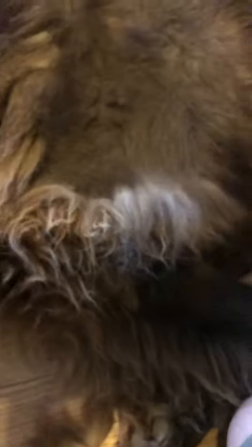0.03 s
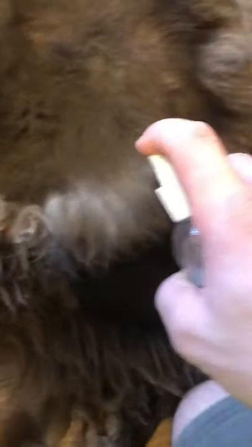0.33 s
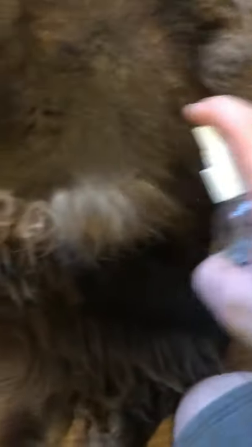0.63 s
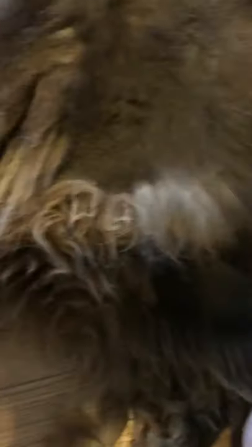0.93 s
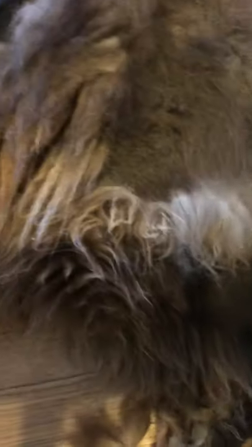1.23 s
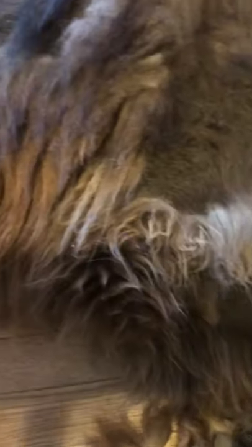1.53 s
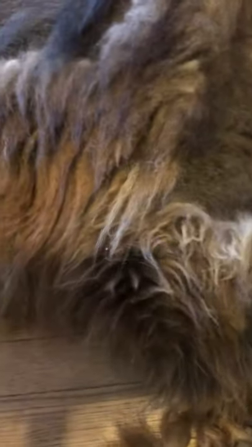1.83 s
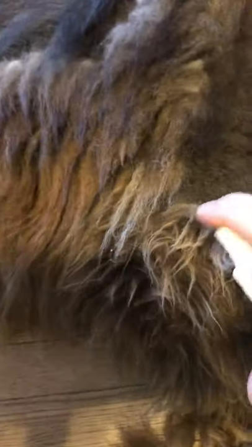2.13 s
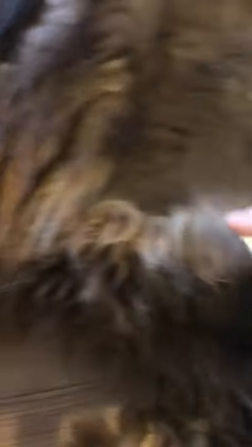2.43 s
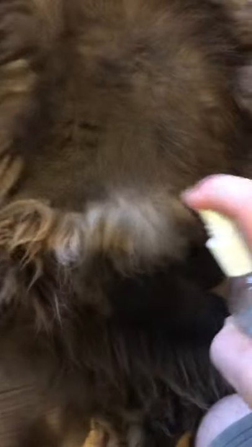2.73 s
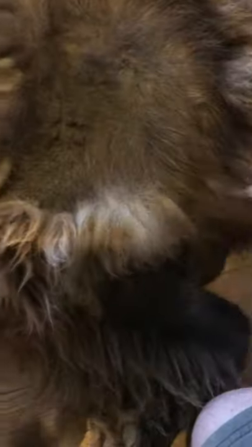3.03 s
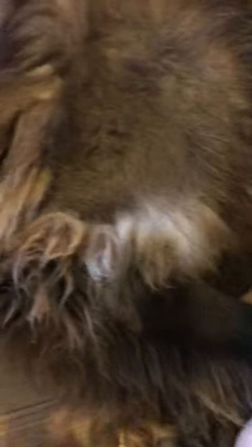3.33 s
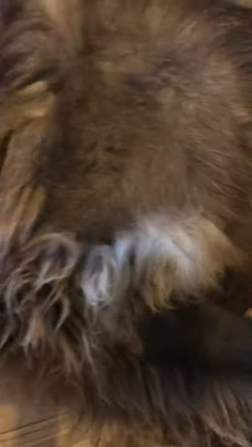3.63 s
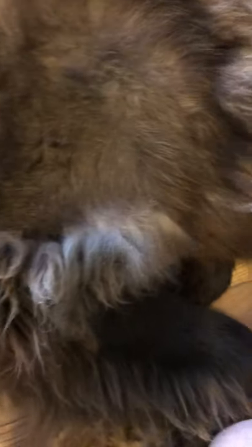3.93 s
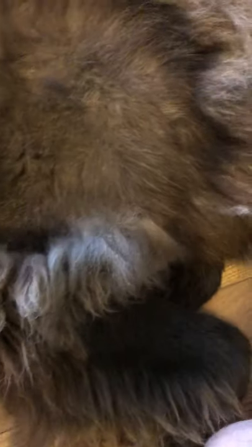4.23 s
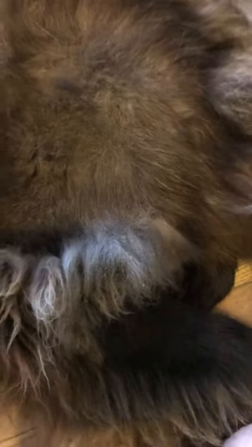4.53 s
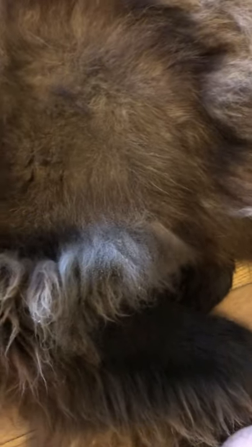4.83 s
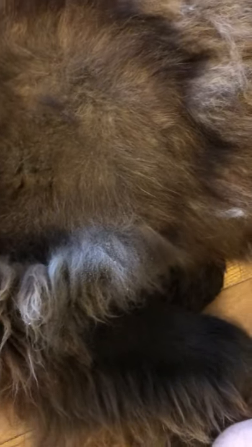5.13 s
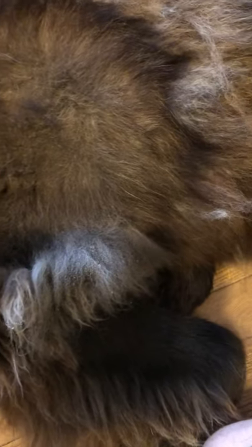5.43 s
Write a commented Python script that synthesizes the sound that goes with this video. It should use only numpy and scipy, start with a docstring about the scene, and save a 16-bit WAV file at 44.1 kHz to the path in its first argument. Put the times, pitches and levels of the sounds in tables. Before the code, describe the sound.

In a small, quiet room, a finger-pump bottle sprays an animal fur eight times, close to the microphone. Each short hiss swells and stops dead, and the plunger returns with a sharp plastic snap and a tiny liquid gulp. Then, a little further away, dull thumps sound on the wooden floor, the fur rustles faintly and a few light woody taps follow. A low room rumble and hum run underneath.

```python
"""A small finger-pump bottle mists an animal fur on a wooden floor: eight quick squirts, up close.
Each push hisses harder as pressure builds, then stops dead as the plunger bottoms out. On release the
seal scrapes, liquid gulps into the pump and its valve snaps. Then bumps ring the floorboards, the fur
rustles under a hand and light woody taps follow, all over the rumble and hum of a quiet, small room."""
import sys
import numpy as np
from scipy import signal
from scipy.fft import rfft, irfft
from scipy.io import wavfile
from scipy.ndimage import uniform_filter1d

SR = 44100
rng = np.random.default_rng(int(sys.argv[2]) if len(sys.argv) > 2 else 0)


def transcribe(signal):
    """Save signal, clipped to [-1, 1], as a 16-bit WAV file at the path in sys.argv[1]."""
    frames = np.atleast_2d(signal).T
    limited = np.clip(frames, -1, 1)
    pcm = np.round(limited * 32767).astype(np.int16)
    wavfile.write(sys.argv[1], SR, pcm)


N = 246474
TIME = np.arange(N) / SR

# tone of the still room: f/Hz, level/dB
ROOM_TONE_EQ = [(15, -63), (25, -27), (44, -20), (70, -11.5), (92, -10), (123, -6), (190, -12), (229, -13),
                (249, -16), (326, -17.5), (405, -23), (1230, -33.5), (4140, -43.5), (5140, -41.5),
                (16000, -49)]
# mains hum partials: f/Hz, level/dB
HUM_PARTIALS = [(59, -67), (120, -64)]
# reverb bands: f/Hz, level/dB, t60/s
REVERB_BANDS = [(170, -18.5, 0.23), (400, -13, 0.31), (800, -13, 0.22), (2010, -15, 0.32),
                (5040, -16.5, 0.28), (8900, -18.5, 0.19), (14000, -23, 0.28)]

# skin sliding on the bottle: peak t/s, level/dB, 20 dB rise/s, 20 dB fall/s
SKIN_SLIDES = [(3.17, -55.5, 0.21, 0.2), (3.34, -58.5, 0.016, 0.097)]
# dull rubs as the grip shifts: peak t/s, level/dB, 20 dB rise/s, 20 dB fall/s
GRIP_SHIFTS = [(1.235, -52.5, 0.13, 0.058), (1.44, -61.5, .12, 0.14)]
# faint hiss as the bottle is put aside: peak t/s, level/dB, 20 dB rise/s, 20 dB fall/s
ASIDE_HISS = [(3.8, -64, 0.96, 1.93)]
# tone of the slide, the grip and that hiss: f/Hz, level/dB
SLIDE_EQ = [(600, -3), (1500, -15), (2400, -4), (3300, -7), (5200, -4.5), (8000, -2), (11000, -6),
            (15000, -15)]
GRIP_EQ = [(100, -19), (210, 1.5), (400, -9), (800, -13), (1400, -16.5), (2300, -19.5), (3500, -23),
           (12000, -43)]
ASIDE_EQ = [(1500, -2), (4300, -8.5), (5200, -2), (5900, -7.5), (7000, -7.5), (10000, -18),
            (13500, -33), (16000, -18)]
# small dry cracks: t/s, level/dB
CRACKS = [(3.728, -32.5), (4.5733, -36.5)]
# their brittle tone: f/Hz, level/dB
CRACK_EQ = [(300, -3), (1600, -30), (2100, 2.5), (3000, -13), (3900, -3.5), (5500, -13), (9000, -15.5),
            (15000, -29)]

# envelope of the hand stroking the fur: t/s, level/dB
FUR_STROKE = [(4.45, -71), (4.52, -60), (4.61, -57.5), (4.71, -71.5), (4.79, -64), (4.86, -55), (5.0, -47),
              (5.1, -48), (5.22, -58), (5.32, -65)]
# tone of the rustle: f/Hz, level/dB
FUR_EQ = [(300, -5), (480, -8.5), (900, -6.5), (1400, -11.5), (2000, -10), (2400, -15), (3100, -7),
          (4100, -17), (5500, -14.5), (9000, -25), (15000, -38)]
# the hide catches and crinkles: t/s, level/dB, length/s, relative hollow ring/dB
HIDE_CRINKLES = [(4.845, -48, 0.018, -35), (4.913, -53, 0.005, -22), (4.939, -40.5, 0.022, -22),
                 (4.994, -50.5, .029, 5.5), (5.066, -46, 0.0068, -11), (5.273, -52.5, .0088, -9)]

# wood modes for thumps and taps: f/Hz, level/dB, t60/s
WOOD_MODES = [(75, -9, 0.29), (116, -9.5, 0.36), (160, -23, 0.19), (170.7, 3, 0.2), (221.5, 0.5, 0.2),
              (249, -2.5, 0.25), (287.6, -10.5, 0.26), (330, -6, 0.16), (392.6, -9.5, 0.12),
              (438, -11, 0.13), (638, -15.5, 0.18), (707, -12, 0.04), (818, -16, 0.055), (1020, -23, 0.063),
              (1340, -30, 0.24), (1500, -4, 0.036), (1630, -4.5, 0.026), (2180, -24, 0.033)]
# dull floor thumps, the first followed by two bounces: t/s, level/dB, contact/ms, ring f/Hz, ring level/dB,
# ring swell/s
FLOOR_THUMPS = [(3.73, -25, 0.25, 223, -25, 0.0056), (3.7463, -27.5, 1.8, 178, -38, .0074),
                (3.771, -39, 1.5, 242, -32, 0.0028), (3.957, -33, 0.61, 223, -43.5, 0.034),
                (4.098, -42, 0.29, 183, -36.5, .013), (4.206, -40.5, 0.41, 167, -50, 0.0065),
                (4.285, -30.5, 1.56, 174.8, -42, 0.038), (4.409, -43, 0.7, 195, -39.5, 0.007),
                (4.448, -42, 0.85, 330, -58, 0.0067)]
# light woody taps: t/s, level/dB, contact/ms, ring f/Hz, ring level/dB
WOODY_TAPS = [(4.669, -46, 0.54, 340, -49), (4.996, -41, 0.31, 830, -36), (5.329, -28.5, 0.72, 400, -54),
              (5.43, -28.5, 0.54, 474, -45), (5.533, -32.5, 0.71, 366, -39)]
# tone of the wooden clatter on each hit: f/Hz, level/dB
CLATTER_EQ = [(80, -17.5), (400, -2.5), (700, 4), (1100, -1), (1650, 1.5), (2300, 2.5), (3500, 0),
              (12000, -11)]

# pump pushes: start t/s, stop t/s, full jet level/dB, gulp level/dB
PUMP_PUSHES = [(.286, .399, -29, -44), (.886, 0.998, -29, -48), (1.247, 1.35, -28, -41),
               (1.566, 1.667, -28.5, -39.5), (1.889, 1.982, -30, -41), (2.211, 2.306, -30.5, -41),
               (2.534, 2.632, -29.5, -40), (2.876, 2.971, -29, -40)]
# pump releases: snap t/s, snap level/dB, gulp level/dB, seal scrape level/dB
PUMP_RELEASES = [(0.0403, -14.5, -39, -56), (0.5134, -32, -43, -62), (1.135, -21, -46, -59),
                 (1.4852, -17.5, -42, -59), (1.8057, -14, -42.5, -56), (2.1193, -17.5, -39, -59),
                 (2.4333, -15, -41.5, -59), (2.7812, -19, -43.5, -59), (3.1111, -20, -47.5, -61)]
# two slugs of liquid per push: offset t/s, relative level/dB, starting f/Hz
SLUGS_ON_PUSH = [(.0016, -2.5, 1497), (.0158, -3, 1314)]
# two more just ahead of each snap: offset t/s, relative level/dB, starting f/Hz
SLUGS_ON_RELEASE = [(-.011, -7.5, 1440), (-.0032, -0.5, 1908)]
# tone of the plastic pump head: f/Hz, level/dB
HEAD_EQ = [(300, -12), (900, -12), (2800, -13), (4200, -3.5), (6400, -2.5), (9300, -3), (11500, -15),
           (16000, -31.5)]
# bright tone of the mist: f/Hz, level/dB
MIST_EQ = [(150, -31), (300, -25.5), (620, -24), (1150, -20), (1550, -16.5), (2440, -11), (3500, -7),
           (4300, -4.5), (6500, -2.5), (9550, -3), (12000, -10), (14000, -16.5), (16000, -21)]

# the finger lifts and the plunger comes unstuck with a tick and a blip, ahead of the snap
UNSTICK_LEAD_S, UNSTICK_TICK_DB, UNSTICK_GULP_DB, UNSTICK_HZ = .055, -34.5, -53, 1254


def undb(db):
    """Decibels to gain."""
    return 10 ** (np.asarray(db) / 20)


def unit(x):
    """Scale to rms 1."""
    return x / np.sqrt(np.mean(x ** 2))


def add(track, s, sound):
    """Mix a sound into a track at time s, if that falls within it."""
    i = int(s * SR)
    if 0 <= i < N:
        track[i:i + len(sound)] += sound[:N - i]


def eq(x, points):
    """Minimum-phase EQ through (f/Hz, level/dB) points, with unit power gain."""
    size = 4096
    hz, db = np.transpose(points)
    log_hz = np.log(np.arange(size // 2 + 1) * SR / size + 1)
    log_gain = np.log(undb(np.interp(log_hz, np.log(hz), db)))
    cepstrum = irfft(log_gain)
    cepstrum[1:size // 2] *= 2
    cepstrum[size // 2 + 1:] = 0
    response = irfft(np.exp(rfft(cepstrum)))
    return signal.fftconvolve(x, response / np.linalg.norm(response))[:len(x)]


def band(x, lo_hz, hi_hz):
    """Steep band-pass."""
    return signal.sosfilt(signal.butter(3, [lo_hz, hi_hz], "band", fs=SR, output="sos"), x)


def resonate(x, hz, width_hz):
    """One resonance, gain 1 at its centre."""
    return signal.lfilter(*signal.iirpeak(hz, hz / width_hz, fs=SR), x)


def drift(rate_hz):
    """Smooth random modulation, rms 1."""
    hold = max(int(SR / rate_hz), 1)
    steps = rng.standard_normal(N)[np.arange(N) // hold]
    return unit(uniform_filter1d(steps, hold))


def grains(per_s, spread_db):
    """Random tiny impacts of uneven size, rms 1."""
    hits = (rng.random(N) < per_s / SR) * rng.standard_normal(N)
    sizes = undb(spread_db * np.minimum(rng.exponential(size=N), 4))
    return unit(hits * sizes)


def fade(curve):
    """Gain along a (t/s, level/dB) curve, silent outside it."""
    s, db = np.transpose(curve)
    return undb(np.interp(TIME, s, db, left=-120, right=-120))


def swells(rows):
    """Gain that rises to each peak and falls away, both at a steady rate in dB."""
    return sum(undb(db - 20 * np.maximum((s - TIME) / rise, (TIME - s) / fall))
               for s, db, rise, fall in rows)


def room_tone(air_db=-59.5):
    """The bed: low room rumble, thin hiss and a wavering mains hum."""
    air = unit(eq(rng.standard_normal(N), ROOM_TONE_EQ))
    air = signal.sosfilt(signal.butter(4, 48, "high", fs=SR, output="sos"), air)
    hum = 0
    for hz, db in HUM_PARTIALS:
        amplitude = np.sqrt(2) * undb(db + 2 * drift(2.9))
        hum += amplitude * np.sin(2 * np.pi * hz * TIME + 0.74 * drift(9.5))
    return air * undb(air_db + 1.3 * drift(4.77)) + hum


def reverb(send, predelay_s=.005):
    """Diffuse reflections from floor and walls: a short tail, each band with its own decay."""
    t = TIME[:SR // 2]
    hz, db, t60 = np.transpose(REVERB_BANDS)
    spectrum = rfft(rng.standard_normal(len(t)))
    log_hz = np.log(np.arange(len(spectrum)) * SR / len(t) + 1)
    tail = 0
    for share, band_db, decay_s in zip(np.eye(len(hz)), db, t60):
        envelope = np.exp(-np.log(1000) * t / decay_s) * (t > predelay_s)
        wash = irfft(spectrum * np.interp(log_hz, np.log(hz), share), len(t))
        tail += undb(band_db) * wash * envelope / np.linalg.norm(envelope)
    return signal.fftconvolve(send, tail)[:N]


def bottle_handling():
    """Skin slides softly over the bottle and rubs dully as the grip shifts; a thin hiss follows."""
    skin = grains(per_s=5000, spread_db=-3.5)
    slide = undb(0.5) * swells(SKIN_SLIDES) * eq(skin, SLIDE_EQ)
    grip = swells(GRIP_SHIFTS) * eq(skin, GRIP_EQ)
    hiss = swells(ASIDE_HISS) * eq(skin, ASIDE_EQ)
    return slide + grip + hiss


def cracks(decay_s=0.00057):
    """Tiny brittle cracks, each a very short spit of noise."""
    force, t = np.zeros(N), TIME[:SR // 100]
    for s, db in CRACKS:
        add(force, s, undb(db) * rng.standard_normal(len(t)) * np.exp(-t / decay_s))
    return undb(3.5) * eq(force, CRACK_EQ)


def fur_rustle(release_s=0.0027):
    """Hairs slip past the hand in dense clicks with a thin scrape; the hide catches and rings hollow."""
    catch, ring_gain = np.zeros(N), np.zeros(N)
    for s, db, length_s, ring_db in HIDE_CRINKLES:
        burst = undb(db) * (TIME > s) * np.exp(-np.maximum(TIME - s - length_s, 0) / release_s)
        catch += burst
        ring_gain += burst * undb(ring_db)
    drag = undb(-1.5) * fade(FUR_STROKE) + undb(-5.5) * catch
    hairs = grains(per_s=3500, spread_db=2) * undb(1.6 * drift(97))
    rustle = band(eq(hairs * drag, FUR_EQ), 180, 16000)
    grit = unit(band(grains(per_s=2800, spread_db=-9), 2700, 3900))
    scrape = drag * grit * undb(-11 + 2 * drift(45))
    hollow = ring_gain * unit(band(grains(per_s=1700, spread_db=-0.5), 705, 950))
    return rustle + scrape + hollow


def wood_cues(thump_deep_db=1.3, tap_deep_db=-17.5, bounce_s=.0105, bounce_db=-5, tap_swell_s=0.0042):
    """Floor thumps come with full low end, the first bouncing twice after it lands; the woody taps are lighter
    and touch twice."""
    for s, db, contact_ms, ring_hz, ring_db, swell_s in FLOOR_THUMPS:
        yield s, db, contact_ms, thump_deep_db, ring_hz, ring_db, swell_s
    for s, db, contact_ms, ring_hz, ring_db in WOODY_TAPS:
        for delay, drop in ((0, 0), (bounce_s, bounce_db)):
            yield s + delay, db + drop, contact_ms, tap_deep_db, ring_hz, ring_db + drop, tap_swell_s


def wood_hits(shelf_hz=330, clatter_db=-7, clatter_s=0.014, crack=2.84, crack_s=0.0021, detune=0.0041):
    """Floor thumps and woody taps: softer contact sounds duller, and each swells into its own ring."""
    out, t = np.zeros(N), TIME[:SR // 2]
    hz, mode_db, t60 = np.transpose(WOOD_MODES)[:, :, None]
    arrival = 1 - np.exp(-t * hz / 0.69)  # low bending waves travel slowly and come in late
    decay = np.exp(-np.log(1000) * t / t60)
    choke = np.exp(-(t / 0.13) ** 4)  # cuts the ring short, as fur lying on a board does
    for s, db, contact_ms, deep_db, ring_hz, ring_db, swell_s in wood_cues():
        pitch = hz * (1 + detune * rng.standard_normal(hz.shape))
        # high modes start either way, by the spot that is hit
        polarity = np.where(hz > shelf_hz, rng.choice([-1, 1], hz.shape), 1)
        gain = polarity * undb(mode_db + deep_db / (1 + (hz / shelf_hz) ** 4))
        modes = np.sum(gain * arrival * decay * np.sin(2 * np.pi * pitch * t), axis=0)
        chatter = rng.standard_normal(len(t)) * (np.exp(-t / clatter_s) + crack * np.exp(-t / crack_s))
        wood = modes + undb(clatter_db) * eq(chatter, CLATTER_EQ)
        contact = t * np.exp(-t / (contact_ms / 1000 / 4))
        hit = undb(db - 4) * signal.fftconvolve(wood, contact / contact.sum())[:len(t)]
        swell = t / swell_s * np.exp(1 - t / swell_s) * choke
        ring = undb(ring_db) * swell * np.sin(2 * np.pi * ring_hz * t)
        add(out, s, hit + ring)
    return band(out, 65, 14000)


def seal_scrape(lead_s=0.031, settle_s=.004):
    """The plunger's seal scrapes up its barrel with a thin squeak, leading into each snap."""
    gate = sum(undb(db) * ((TIME > snap_at - lead_s) & (TIME < snap_at + settle_s))
               for snap_at, _, _, db in PUMP_RELEASES)
    scrape = grains(per_s=3900, spread_db=3.5) * gate
    squeak = undb(11) * resonate(scrape, 2840, 500)
    return band(scrape, 2000, 9200) + squeak


def slugs():
    """Cues for the liquid moving in each pump cycle: t/s, level/dB, starting f/Hz."""
    pushed = [(start + offset, db + trim_db, hz)
              for start, _, _, db in PUMP_PUSHES for offset, trim_db, hz in SLUGS_ON_PUSH]
    drawn = [(snap_at + offset, db + trim_db, hz)
             for snap_at, _, db, _ in PUMP_RELEASES for offset, trim_db, hz in SLUGS_ON_RELEASE]
    unstuck = [(snap_at - UNSTICK_LEAD_S, UNSTICK_GULP_DB, UNSTICK_HZ) for snap_at, *_ in PUMP_RELEASES]
    return pushed + drawn + unstuck


def gulps(attack_s=0.0012, tail_s=0.021, glide_s=0.00393, end_ratio=0.24, scatter=0.09):
    """Each gulp is a short frothy blip that falls quickly in pitch; the bottle rings low with it."""
    blips, t = np.zeros(N), TIME[:SR // 25]
    glide = end_ratio + (1 - end_ratio) * np.exp(-t / glide_s)
    envelope = t / attack_s * np.exp(1 - t / attack_s) + undb(-17) * np.exp(-t / tail_s)
    for s, db, hz in slugs():
        pitch = hz * (1 + scatter * rng.standard_normal()) * glide
        tone = np.sin(2 * np.pi * np.cumsum(pitch) / SR)
        froth = unit(band(rng.standard_normal(len(t)), 473, 2570))
        add(blips, s, undb(db) * envelope * (tone + froth))
    bottle = undb(-1) * resonate(blips, 690, 136)
    return band(blips + bottle, 410, 4300)


def pump_snaps(rattle_s=0.0088, rattle_db=-15, rebound_s=0.0024, rebound_db=-10, buzz_s=0.0021):
    """The plunger unsticks, snaps home and rattles: each a hard tick, a plastic buzz and one rebound."""
    force, t = np.zeros(N), TIME[:SR // 50]
    for snap_at, snap_db, _, _ in PUMP_RELEASES:
        unstick = (snap_at - UNSTICK_LEAD_S, UNSTICK_TICK_DB)
        rattle = (snap_at + rattle_s, snap_db + rattle_db)
        for s, db in (unstick, (snap_at, snap_db), rattle):
            for delay, drop_db, edge in ((0, 0, 1), (rebound_s, rebound_db, .4)):
                buzz = undb(-15) * rng.standard_normal(len(t)) * np.exp(-t / buzz_s)
                buzz[0] += edge  # the hard transient
                add(force, s + delay, buzz * undb(db + drop_db))
    click = eq(force, HEAD_EQ)
    return undb(0.5) * click + undb(1) * resonate(click, 6480, 350)


def mist(opening_db=-12.5, build_share=0.7, bend=2.01, open_s=0.0019, shut_s=0.0062):
    """Pressure builds in each push; the jet tears into droplets and stops dead at the end of travel."""
    flow = np.zeros(N)
    for start, stop, db, _ in PUMP_PUSHES:
        travel = (TIME - start) / (stop - start)
        build_left = np.clip(1 - travel / build_share, 0, 1)
        valve = np.clip((TIME - start) / open_s, 0, 1) * np.clip((stop - TIME) / shut_s + .5, 0, 1)
        flow += valve * undb(db + opening_db * build_left ** bend)
    jet = unit(rng.standard_normal(N) + undb(-5) * grains(per_s=5000, spread_db=3))
    cone_flutter = undb(0.37 * drift(220) + 0.63 * drift(60))
    hiss = eq(jet * cone_flutter * flow, MIST_EQ)
    return hiss + undb(-7) * resonate(hiss, 2940, 300) + undb(-9.5) * resonate(hiss, 6500, 500)


def scene():
    """The pump up front; wood, fur and handling further back and wetter; mono on both channels."""
    near = mist() + pump_snaps() + gulps() + seal_scrape()
    further = wood_hits() + fur_rustle() + cracks() + bottle_handling()
    send = undb(2) * near + undb(7) * further
    mono = near + further + reverb(send) + room_tone()
    return np.array([mono, mono])


def record(dry, top_hz=15900):
    """A steep low-pass shaves off the very top."""
    return signal.sosfilt(signal.ellip(10, .2, 70, top_hz, fs=SR, output="sos"), dry)


dry = scene()
out = record(dry)
transcribe(out)
```